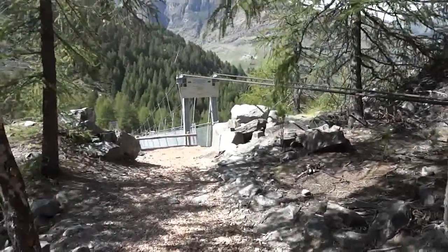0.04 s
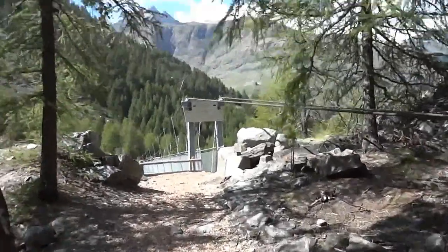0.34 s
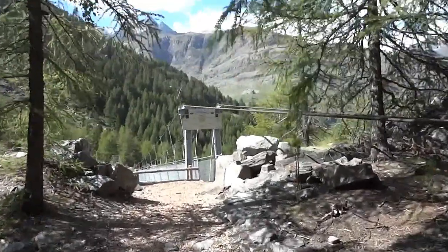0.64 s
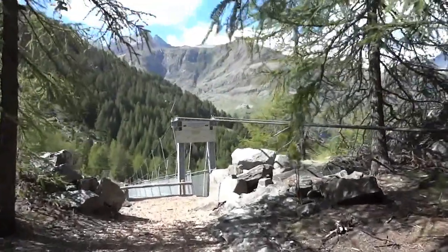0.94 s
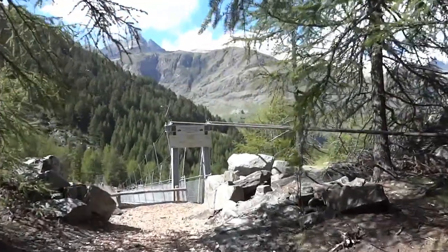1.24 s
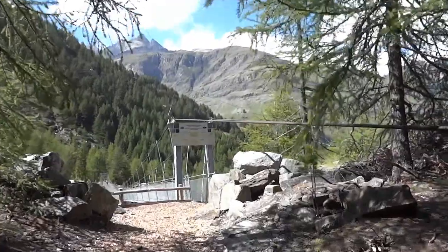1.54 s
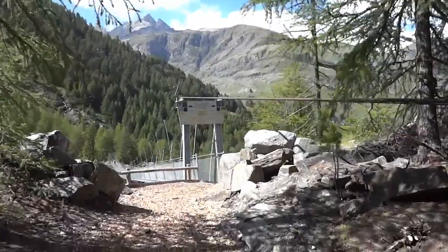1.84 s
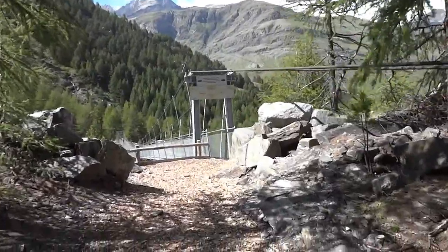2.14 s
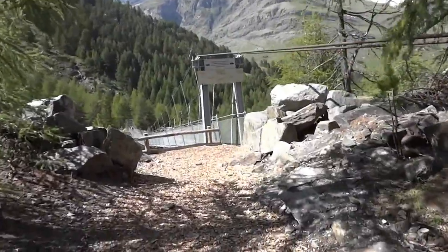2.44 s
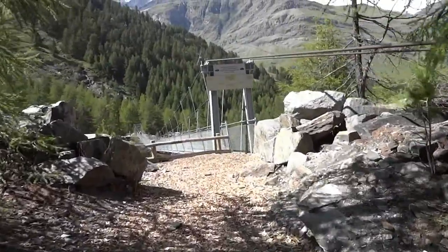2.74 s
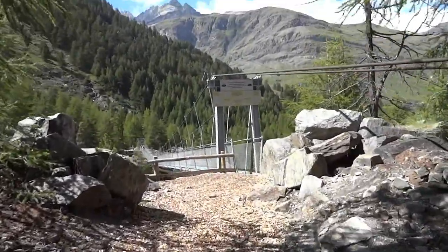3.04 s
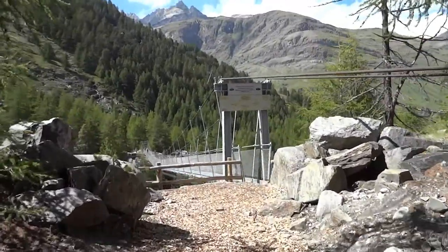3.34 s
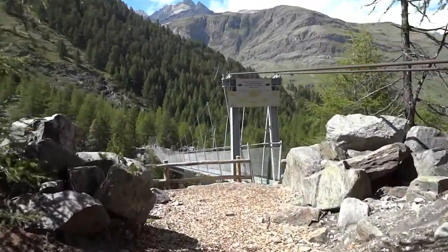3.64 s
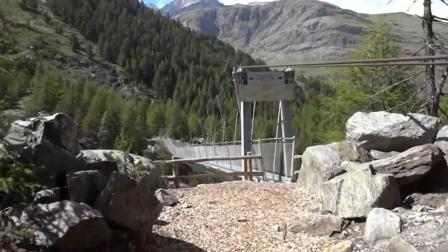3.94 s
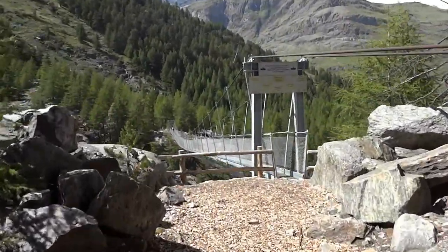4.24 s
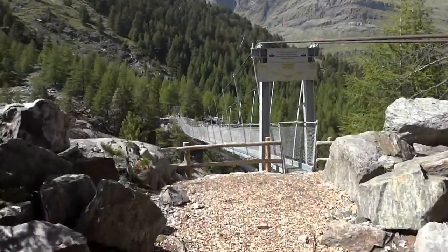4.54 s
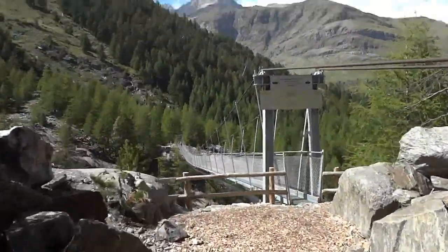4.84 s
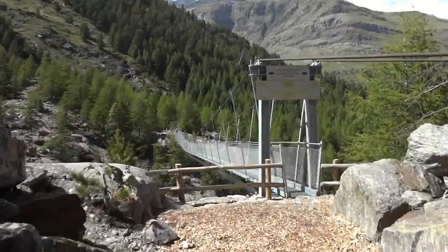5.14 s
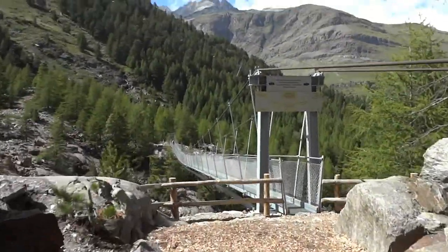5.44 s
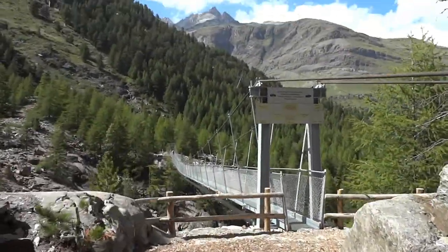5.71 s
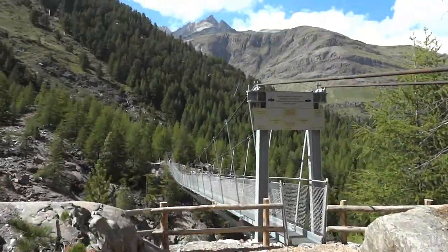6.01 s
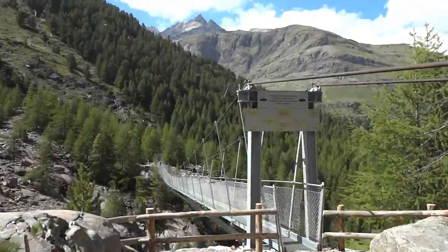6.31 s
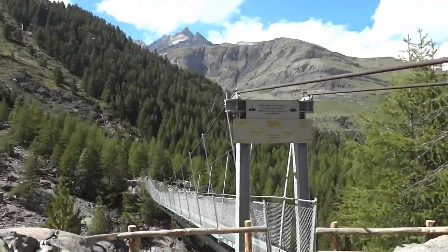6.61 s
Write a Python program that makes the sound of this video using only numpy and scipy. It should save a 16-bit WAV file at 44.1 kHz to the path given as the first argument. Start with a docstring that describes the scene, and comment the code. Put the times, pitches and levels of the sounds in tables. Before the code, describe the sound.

Footsteps crunch on a path of loose wood chips, close below the microphone, for about seven seconds. The chips grind, slide and rustle unevenly, with dry twigs snapping and small stones clicking. Sharper crunches come around 0.2 and 0.9 seconds, a quick run of cracks at 1.5, and two stick knocks near 2 and 2.2. The steps are lighter from about 2.5 to 4 seconds, then crunch and scrape more firmly between 4.4 and 5.2, and again from 5.9 to the end. Between 0.5 and 1 second a faint, distant bird whistles three thin, high, falling notes. Wind rumbles on the microphone, with low buffets around 1.7 and 2.5 seconds and stronger gusts from 3.6 to 4.4, around 6 and near 6.7. Throughout, a river rushes softly and steadily far below, slightly to the left.

```python
"""Wood chips crunch right below a hand-held camera: someone walks down a path towards a mountain gorge.
Chips grind and slide under the soles, clumps give way, dry twigs snap, sticks knock, small stones click,
and a few footfalls thud. Gusts rumble and buffet at the camera's close-set microphone ports.
Far below and a little to the left a river rushes, and near the start a small, distant bird whistles
three thin falling notes."""
import sys
import numpy as np
from scipy import signal
from scipy.fft import rfft, irfft
from scipy.io import wavfile
from scipy.ndimage import uniform_filter1d

SR = 44100
rng = np.random.default_rng(int(sys.argv[2]) if len(sys.argv) > 2 else 0)


def output_pcm(signal):
    """Save a mono or channel-first signal as 16-bit PCM at the path in sys.argv[1].

    Samples are clipped to [-1, 1] before scaling.
    """
    pcm = np.clip(np.atleast_2d(signal).T, -1, 1) * 32767
    wavfile.write(sys.argv[1], SR, np.round(pcm).astype(np.int16))


N = 302967
TIME, FREQ = np.arange(N) / SR, np.fft.rfftfreq(N, 1 / SR)


def footsteps():
    """Grinding, sliding and breaking chips on the path, right below the microphone."""
    # spectra of grinding chips, sliding fines and thin rustle: f/Hz, level/dB
    grind_colour = [(100, -28), (300, -6), (700, 4), (1400, 6.5), (2100, 8.5), (2700, 6.5), (3200, 3.5),
                    (4100, -11), (6000, -63.5), (11000, -66)]
    slide_colour = [(1000, -39), (3000, 15), (4500, 19.5), (6000, 17), (7500, 5), (9000, -38.5),
                    (11000, -101)]
    rustle_colour = [(4000, -22), (7000, 8.5), (9000, 19.5), (10300, 23.5), (11500, -3.5)]
    # side against mid for the close chips: f/Hz, level/dB
    chip_side = [(100, -10), (300, 0), (650, 2.5), (1400, 1.5), (2600, -.5), (5000, -6), (8000, -11),
                 (11000, -13)]
    # where the feet fall: t/s, left minus right/dB, phase lead (+ left, - right)
    step_lean = [(2.3, .7, .9), (2.8, 2, -.3), (3.0, 2, -.3), (3.26, 8, 0), (3.38, 6, 0), (3.55, .3, .4),
                 (4.3, .2, .9), (4.68, .2, .9), (4.78, .2, .2), (5.0, .2, .2), (5.12, .5, .9),
                 (6.4, 1.3, .9)]
    grind, slide, rustle = sole_pressure()
    chips = litter(grind, grind_colour, rate=7000, spread_db=-2.5, clump_db=2, gain_db=1)
    chips += litter(slide, slide_colour, rate=8300, spread_db=-2.5, clump_db=2, gain_db=-2)
    chips += litter(rustle, rustle_colour, rate=6200, spread_db=-0.5, clump_db=2.5, gain_db=-4)
    mid, stray = chips + crushes() + snaps() + knocks() + pebbles() + scrapes()
    lean_db, lead = curves(step_lean)
    balance = undb(np.array([lean_db, -lean_db]) / 2)
    return ports(mid, stray, chip_side, lead, stray_db=-5) * balance


def sole_pressure(sway_db=-1):
    """How hard the soles work the chips, the fines and the rustling litter: each scuff drives all three."""
    # a sole pressing and dragging: t/s, length/s, grind/dB, slide/dB, rustle/dB
    scuffs = [(0.0, 0.053, -50.5, -47, -32), (0.084, 0.091, -59.5, -50.5, -59),
              (0.212, 0.16, -53, -44, -46.5), (0.455, 0.033, -64, -40.5, -70.5),
              (0.538, 0.66, -72, -53.5, -92.5), (0.923, 0.034, -33.5, -35.5, -80),
              (0.994, 0.038, -40.5, -31.5, -56), (1.076, 0.21, -40, -64, -57),
              (1.314, 0.27, -39.5, -65.5, -75.5), (1.62, 0.048, -44, -38.5, -47),
              (1.722, 0.29, -40.5, -92, -49.5), (1.943, 0.072, -38.5, -66, -72.5),
              (2.066, 0.16, -37, -63.5, -90), (2.235, 0.064, -42, -40, -100),
              (2.355, 0.095, -52.5, -46.5, -90), (2.491, 0.027, -41, -40.5, -34.5),
              (2.639, 1.468, -53.5, -52.5, -52.5), (2.867, 0.065, -49.5, -45.5, -41.5),
              (3.259, 0.11, -48.5, -45, -45), (3.528, 0.0084, -59.5, -52, -41),
              (3.66, 0.18, -49, -56, -39.5), (4.212, .077, -46, -48, -49.5),
              (4.374, 0.0043, -42.5, -35.5, -48.5), (4.432, 0.032, -30.5, -27.5, -83),
              (4.562, 0.064, -34.5, -44, -69), (4.632, 0.13, -42, -41, -51),
              (4.786, 0.081, -37.5, -37, -43), (4.875, 0.1, -42, -41, -42), (4.974, 0.24, -49, -41.5, -45),
              (5.257, 0.25, -69, -52, -56), (5.508, 0.071, -43.5, -43, -84),
              (5.658, .66, -48.5, -55.5, -78.5), (6.094, 0.061, -55, -46, -88),
              (6.269, 0.057, -56.5, -44, -79.5), (6.437, 0.012, -36, -45.5, -89),
              (6.53, 0.057, -41, -47, -39.5), (6.61, 0.081, -45.5, -42, -36.5),
              (6.752, 0.13, -53, -55.5, -57.5)]
    # trodden litter still shifting between scuffs: grind/dB, slide/dB, rustle/dB
    settling_db = (-60.5, -79, -102)
    power = np.outer(undb(settling_db), undb(sway_db * drift(rate=20))) ** 2
    for start, length, *db in scuffs:
        power += np.outer(undb(db), envelope(start, length, attack_s=0.027, release_s=0.026)) ** 2
    return np.sqrt(power)


def litter(push, spectrum, rate, spread_db, clump_db, gain_db):
    """Loose pieces rub in small clumps; more pressure sets more of them moving. Two unrelated streams."""
    clumps = undb(clump_db * drift(rate=110))
    density = rate * np.sqrt(unit(push))
    rubs = [grains(density, spread_db) / np.sqrt(density) for _ in range(2)]
    streams = np.array([unit(shape(rub, colour(spectrum))) for rub in rubs])
    return streams * push * clumps * undb(gain_db)


def crushes(q=0.67, cutoff_ratio=1.76, thud_db=-9.5, thud_hz=560):
    """A clump collapses in a swell of fractures that ring at the pitch of its pieces and thud in the bed."""
    # clumps giving way underfoot: t/s at the peak, level/dB, rise/s, fall/s, f/Hz
    clumps = [(.009, -31.5, 0.013, 0.05, 7900), (0.26, -29.5, 0.0024, 0.0045, 2840),
              (.922, -27, 0.0055, 0.0071, 2530), (.9345, -20, 0.002, 0.0027, 1400),
              (0.9402, -21, 0.0011, .005, 950), (0.969, -33, .006, .007, 3300),
              (0.978, -21, 0.001, 0.005, 930), (1.004, -25.5, 0.011, 0.015, 7900),
              (1.021, -28.5, 0.0036, 0.014, 7000), (1.104, -27, 0.0084, 0.012, 1340),
              (1.575, -22.5, .0012, 0.004, 1710), (1.577, -28, .002, .003, 550),
              (1.643, -34.5, 0.034, 0.0091, 6150), (1.648, -32.5, 0.012, 0.016, 875),
              (1.851, -36, 0.0024, 0.002, 2780), (2.205, -26, 0.0064, 0.0079, 2320),
              (2.521, -31.5, 0.0047, 0.016, 1330), (2.842, -28.5, 0.0031, 0.016, 7300),
              (3.312, -27, 0.0015, 0.004, 1760), (4.218, -30, 0.0044, 0.0055, 1450),
              (4.248, -33.5, .0024, 0.0067, 1340), (4.374, -34.5, 0.012, 0.011, 7450),
              (4.431, -26, 0.0087, 0.0064, 4500), (4.443, -24.5, .004, 0.0083, 2980),
              (4.457, -23.5, 0.004, 0.012, 2650), (4.479, -23, 0.007, 0.016, 2670),
              (4.499, -31.5, .003, 0.017, 2470), (4.634, -19.5, 0.013, 0.0082, 2670),
              (5.1405, -25, 0.0053, 0.0026, 3180), (5.148, -24, 0.0041, 0.0048, 3070),
              (5.186, -34, 0.0048, 0.016, 2940), (5.508, -34.5, 0.0054, 0.013, 380),
              (5.896, -25.5, 0.0055, 0.0074, 4960), (5.908, -28, 0.0027, 0.011, 4400),
              (5.9, -24.5, 0.0017, 0.0074, 1520), (6.376, -26, 0.0016, 0.005, 2240),
              (6.401, -20.5, 0.00067, 0.0068, 1030), (6.404, -23.5, 0.002, 0.0099, 2470),
              (6.45, -29, 0.0048, 0.0055, 1830), (6.7, -25.5, 0.006, 0.013, 1180),
              (6.723, -32.5, 0.00092, 0.0063, 1220)]
    out = np.zeros((2, N))
    fractures = np.array([grains(rate=6000, spread_db=0.5) for _ in range(2)])
    for t, db, rise, fall, hz in clumps:
        near = np.abs(TIME - t) < 0.2
        age = TIME[near] - t
        swell = np.exp(-np.abs(age) / np.where(age < 0, rise, fall))
        ring = unit(damp(resonate_twice(fractures[:, near], hz, q), cutoff_ratio * hz))
        thud = unit(damp(resonate_twice(fractures[:, near], thud_hz, q), cutoff_ratio * thud_hz))
        out[:, near] += undb(db) * swell * (ring + undb(thud_db) * thud)
    return out


def snaps(q=0.9, splinter_s=0.0016, cutoff_ratio=1.8, gain_db=-1):
    """A sharp break rings for a cycle or two; splinters crackle just after it; wood damps the overtones."""
    # twigs and chips breaking: t/s, level/dB, f/Hz, splinters against the break/dB
    breaks = [(0.2212, -13, 6250, -23), (0.2476, -18, 5740, -15), (0.792, -30, 5500, 0),
              (0.906, -16, 2300, -11), (.918, -10.5, 2250, -0.5), (.932, -11, 1900, -13),
              (0.9775, -13, 1090, -27), (1.5018, -16, 2390, -13), (1.52, -17, 1900, -10),
              (1.5256, -17, 1700, -16), (1.5315, -12, 1900, -29), (1.536, -14, 2200, -19),
              (1.5423, -12.5, 2300, -16), (1.5477, -8.5, 2200, -26), (1.5608, -10, 1900, -38),
              (1.5702, -12, 1600, -32), (1.5732, -13, 1500, -28), (1.5748, -12, 2200, -22),
              (1.578, -15, 1700, -24), (1.746, -22, 1620, -5), (2.07, -20, 1860, 6),
              (3.005, -18, 8250, -36), (3.2643, -19, 3420, -25), (3.305, -26, 1200, -10),
              (3.3635, -16, 9350, -19), (3.5148, -23, 4200, -22), (3.5338, -15, 8800, -4.5),
              (3.8032, -25, 3700, -14), (4.634, -24, 2300, -7), (4.7497, -6.5, 5300, -33),
              (4.7614, -12, 4000, -28), (4.9426, -12.5, 1640, -12), (5.172, -13, 2700, -9),
              (5.574, -21, 3340, -14), (5.8964, -11, 5050, -16), (6.3987, -11, 1900, -22),
              (6.6986, -14.5, 1330, -32), (6.72, -15, 2100, -26)]
    out, age = np.zeros(N), TIME[:SR // 20]
    for t, db, hz, splinter_db in breaks:
        crack = undb(splinter_db) * rng.standard_normal(len(age)) * np.exp(-age / splinter_s)
        crack[0] += 1  # the break itself
        ring = damp(resonate_twice(crack, hz, q), cutoff_ratio * hz)
        add_hit(out, ring, int(t * SR), db + gain_db)
    return out


def knocks(q=2.7, cutoff_hz=4200, thud_hz=800, thud_db=-9):
    """A dry stick rings for a few cycles at one pitch and thuds into the bed of chips."""
    # loose sticks knocking together: t/s, level/dB, f/Hz
    sticks = [(1.991, -10.5, 2300), (2.2024, -12.5, 2330)]
    out, tap = np.zeros(N), signal.unit_impulse(SR // 20)
    thud = undb(thud_db) * damp(resonate(tap, thud_hz, q=1), 2 * thud_hz)
    for t, db, hz in sticks:
        ring = damp(resonate_twice(tap, hz, q), cutoff_hz)
        add_hit(out, ring + thud, int(t * SR), db)
    return out


def pebbles(contact_s=0.00015):
    """Stone on stone: a hard, short contact rings a few modes for some milliseconds."""
    # small stones clicking underfoot: t/s, level/dB, f/Hz, t60/s
    clicks = [(0.5153, -15, 3560, .006), (.5163, -17.5, 3480, .007), (.9356, -12.5, 2150, .008),
              (0.9413, -14, 2100, 0.0091), (1.502, -13.5, 1860, 0.011), (3.2642, -21.5, 2730, 0.0044),
              (3.266, -20.5, 2700, 0.0103), (5.1409, -14.5, 3200, 0.0044), (6.4035, -21, 1890, .016),
              (6.4064, -20.5, 2530, .012), (6.409, -18, 1480, .014)]
    # modes of a stone: multiple of its pitch, level/dB
    modes = [(.47, -12), (1, -2), (1.36, 0), (1.79, -2), (2.29, -9)]
    out, age = np.zeros(N), TIME[:SR // 20]
    onset = 1 - np.exp(-(age / contact_s) ** 2)
    for t, db, hz, t60 in clicks:
        ring = sum(undb(mode_db) * np.sin(2 * np.pi * (hz * ratio * age + rng.random()))
                   for ratio, mode_db in modes)
        decay = np.exp(-np.log(1000) * age / t60)
        add_hit(out, ring * decay * onset, int(t * SR), db)
    return out


def scrapes(edge_s=0.0099):
    """Stick and slip under a dragging sole keep the chips ringing for as long as the scrape lasts."""
    # drags of the sole: t/s, length/s, level/dB, f/Hz, Q
    drags = [(.997, .027, -35, 4380, 9), (.997, .025, -34, 7100, 4), (4.79, .17, -40, 2610, 8),
             (4.838, .024, -39, 5650, 4), (6.54, .05, -40, 3800, 1.8), (6.6, .095, -40.5, 4500, 2.8)]
    slips = grains(rate=1900, spread_db=0)
    return sum(undb(db) * unit(resonate_twice(slips, hz, q)) * envelope(start, length, edge_s, edge_s)
               for start, length, db, hz, q in drags)


def wind_and_thuds(rumble_db=-45, rumble_growth=0.59, flutter_db=-0.5, tear_db=-51, tear_growth=3):
    """Light air rumbles at the ports, gusts flutter, the strongest tear higher; a few footfalls thud."""
    # spectra of the three kinds of turbulence: f/Hz, level/dB
    rumble_colour = [(20, -22.5), (60, -5), (130, -1), (220, -6), (400, -17.5), (900, -56), (2000, -77.5)]
    flutter_colour = [(30, -34.5), (100, -9.5), (190, 1), (310, -2.5), (500, -10), (900, -19), (2000, -55),
                      (5000, -105)]
    tear_colour = [(150, -15), (400, 13.5), (600, 16), (900, 8), (1500, -16.5), (4000, -64.5)]
    # side against mid for wind on the microphone: f/Hz, level/dB
    wind_side = [(30, -14), (100, -9), (200, -3.5), (350, 0), (700, 2), (2000, -2)]
    # how the air meets the ports: t/s, phase lead (+ left, - right), rumble boost/dB
    airflow = [(0, -0.84, 3), (.3, -0.27, -2.5), (.7, -0.043, -11.5), (1.15, -0.18, -5), (1.45, 0.14, 4),
               (1.7, 0.065, 1), (2.1, -0.05, 6), (2.5, 0.96, 2.5), (3.0, -0.041, 7), (3.6, -0.83, -0.5),
               (4.35, -0.82, -2), (4.5, 0.021, 5), (4.8, -0.4, 1), (5.1, 0.08, 1.5), (5.4, -0.7, 2.5),
               (6.0, 0.93, 1), (6.6, 0.016, -4)]
    lead, boost_db = curves(airflow)
    strength = low_swells()
    rumble = undb(rumble_db + boost_db) * unit(strength ** rumble_growth) * turbulence(rumble_colour)
    flutter = undb(flutter_db) * strength * turbulence(flutter_colour)
    tear = undb(tear_db) * unit(strength ** tear_growth) * turbulence(tear_colour)
    lumps = undb(1.7 * drift(rate=50))
    mid, stray = (rumble + flutter + tear) * lumps
    return ports(mid + low_thumps(), stray, wind_side, lead, stray_db=-3)


def low_swells(rise_s=0.051, fall_s=0.031, breeze_db=-64):
    """Strength of the low noise: gusts and one footfall rise, hold and fall over a light breeze."""
    # gusts reaching the microphone, and the low thump of a footfall near 0.94 s: t/s, length/s, level/dB
    swells = [(0.0, 0.044, -48.5), (0.941, 0.086, -49), (1.49, 0.32, -47), (1.674, 0.041, -42.5),
              (1.992, 0.45, -69), (2.365, 0.3, -40.5), (2.687, 0.18, -55.5), (3.49, 0.13, -48),
              (3.668, 0.18, -34), (3.815, .03, -41), (4.114, 0.23, -36.5), (4.476, 0.045, -43),
              (4.706, 0.15, -39), (4.919, 0.17, -39.5), (5.678, 0.12, -48.5), (5.92, 0.22, -29.5),
              (6.173, 0.18, -35), (6.36, 0.32, -40), (6.675, 0.066, -34), (6.773, 0.097, -45.5)]
    power = sum((undb(db) * envelope(start, length, rise_s, fall_s)) ** 2 for start, length, db in swells)
    return np.sqrt(power + undb(breeze_db) ** 2)


def turbulence(spectrum):
    """Two unrelated streams of small eddies."""
    return np.array([unit(shape(grains(rate=1800, spread_db=2), colour(spectrum))) for _ in range(2)])


def low_thumps(q=1.4, pitch_scatter=0.14, gain_db=-1):
    """An eddy or a soft footfall is one steep pressure kick that dies within a couple of cycles."""
    # eddies hitting the ports, and soft footfall thuds at 1.875 and 3.488 s:
    # t/s at the peak, level/dB, f/Hz
    thumps = [(.008, -30.5, 223), (1.691, -29, 288), (1.702, -20, 183), (1.718, -29, 230),
              (1.756, -24, 150), (1.787, -26, 290), (1.875, -30, 190), (2.447, -23, 208), (2.472, -21, 210),
              (2.506, -26.5, 230), (2.549, -22.5, 266), (2.576, -28, 200), (3.488, -29, 253),
              (3.641, -15, 336), (3.662, -18, 226), (3.722, -19, 248), (3.736, -11.5, 244),
              (3.751, -18, 194), (3.782, -17, 233), (3.802, -20, 252), (3.82, -18, 262), (3.844, -15, 224),
              (4.193, -13.5, 534), (4.201, -12.5, 324), (4.252, -22, 278), (4.276, -21.5, 258),
              (4.284, -20.5, 254), (4.33, -14.5, 227), (4.337, -17.5, 347), (4.713, -17.5, 240),
              (4.794, -25, 196), (4.988, -21, 195), (5.129, -25.5, 148), (5.937, -13, 264),
              (5.948, -15.5, 214), (5.97, -22, 380), (6.003, -17, 580), (6.015, -20, 267),
              (6.03, -14.5, 234), (6.0355, -12.5, 760), (6.051, -18.5, 298), (6.061, -21, 280),
              (6.093, -15, 560), (6.111, -20, 240), (6.167, -19, 295), (6.278, -23, 223),
              (6.678, -18.5, 290), (6.728, -21, 282)]
    out, age = np.zeros(N), TIME[:SR // 10]
    for t, db, hz in thumps:
        pitch = hz * np.exp(pitch_scatter * rng.standard_normal())
        push = np.exp(-2 * np.pi * age * pitch)
        kick = rng.choice([-1, 1]) * resonate_twice(push, pitch, q)
        start = max(int(t * SR) - np.abs(kick).argmax(), 0)
        add_hit(out, kick, start, db + gain_db)
    return out


def river(level_db=-43.5, left_db=6.5, split_hz=900, surge_db=0.8):
    """White water far down in the gorge: a smooth rush whose lows and highs surge a little on their own."""
    # spectrum of the water as heard from the path: f/Hz, level/dB
    river_colour = [(20, -9.5), (100, -23), (160, -10), (250, 3), (450, 6.5), (850, 7.5), (1400, 3.5),
                    (2500, -2), (4000, -8), (7000, -53), (11000, -78.5)]
    # side against mid for sound from all around: f/Hz, level/dB
    river_side = [(50, -24), (250, -13), (600, -10), (1300, -7), (3000, -5), (8000, -6)]
    low = 1 / (1 + (FREQ / split_hz) ** 2)
    water = []
    for _ in range(2):
        rush = unit(shape(rng.standard_normal(N), colour(river_colour)))
        water.append(sum(shape(rush, band) * undb(surge_db * drift(rate=7)) for band in (low, 1 - low)))
    mid, side = water[0], shape(water[1], colour(river_side))
    lean_db = left_db / 2 * FREQ / (FREQ + 250)  # the bass has no direction
    return undb(level_db) * np.array([shape(mid + side, undb(lean_db)), shape(mid - side, undb(-lean_db))])


def bird(hold_s=0.056, waver=0.012, flutter_db=3, forest_t60_s=0.53, echo_db=-2):
    """A far, wavering whistle: each note arches over its crest and slides down; trunks scatter the call."""
    # three thin notes: t/s at the crest, level/dB, crest f/Hz, end f/Hz, fall/s
    notes = [(.525, -53, 7980, 7280, .05), (.705, -55.5, 7850, 6900, .06), (.893, -49, 7250, 6550, .028)]
    call = np.zeros(N)
    for t, db, crest_hz, end_hz, fall in notes:
        arch_hz = end_hz + (crest_hz - end_hz) * np.exp(-((TIME - t) / fall) ** 2)
        hz = arch_hz * (1 + waver * drift(rate=1100))
        swell = envelope(t, hold_s, attack_s=0.02, release_s=0.023)
        loudness = undb(db + flutter_db * drift(rate=80)) * swell
        call += loudness * np.sin(2 * np.pi * np.cumsum(hz) / SR)
    trunks = rng.standard_normal((2, SR)) * np.exp(-np.log(1000) * TIME[:SR] / forest_t60_s)
    echoes = np.array([signal.fftconvolve(call, tail / np.linalg.norm(tail))[:N] for tail in trunks])
    return call + undb(echo_db) * echoes


def ports(mid, stray, side_colour, lead, stray_db):
    """Close-set ports turn a near sound into a side signal a quarter turn out of phase, plus stray sound."""
    side_gain = colour(side_colour)
    side = lead * shape(mid, 1j * side_gain) + undb(stray_db) * shape(stray, side_gain)
    return np.array([mid + side, mid - side])


def grains(rate, spread_db):
    """Tiny impacts of uneven size at random moments, rate per second."""
    chance, size, sign = rng.random(N), rng.exponential(size=N), rng.choice([-1, 1], N)
    return unit((chance < rate / SR) * sign * undb(spread_db * np.minimum(size, 4)))


def drift(rate):
    """Smooth random wander with a spread near 1, taking rate new values per second."""
    count = int(SR / rate)
    held = rng.standard_normal(2048)[np.arange(N) // count % 2048]
    return np.sqrt(2) * uniform_filter1d(uniform_filter1d(held, count), count)


def envelope(start, length, attack_s, release_s):
    """Swell up to the start, hold for the length, die away."""
    return np.exp(np.minimum(TIME - start, 0) / attack_s - np.maximum(TIME - start - length, 0) / release_s)


def curves(rows):
    """One curve over time for each value column of (t/s, values...) rows."""
    times, *columns = np.transpose(rows)
    return [np.interp(TIME, times, column) for column in columns]


def add_hit(out, hit, start, peak_db):
    """Mix a short sound in at a start sample and peak level."""
    out[start:start + len(hit)] += undb(peak_db) * hit[:N - start] / np.abs(hit).max()


def resonate(x, hz, q):
    """One damped resonance."""
    hz = min(hz, SR / 3)
    return signal.lfilter(*signal.iirpeak(hz, max(q, 3 * hz / SR), fs=SR), x)


def resonate_twice(x, hz, q):
    """Two equal resonances in series, for steeper skirts."""
    return resonate(resonate(x, hz, q), hz, q)


def damp(x, hz):
    """Soft wood swallows what lies above a frequency."""
    return signal.lfilter(*signal.butter(2, min(hz, SR / 3), fs=SR), x)


def colour(points):
    """Gain at every frequency from (f/Hz, level/dB) points."""
    hz, db = np.transpose(points)
    return undb(np.interp(np.log(FREQ + 1), np.log(hz), db))


def shape(x, gain):
    """Filter by a gain per frequency."""
    return irfft(rfft(x) * gain, N)


def unit(x):
    """Scale to rms 1."""
    return x / np.sqrt(np.mean(x ** 2) + 1e-18)


def undb(db):
    """Decibels to gain."""
    return 10 ** (np.asarray(db) / 20)


def scene():
    """Steps close below, wind on the microphone, river and bird in the distance."""
    return footsteps() + wind_and_thuds() + river() + bird()


def record(dry):
    """The camera cuts the top of the treble."""
    top_hz = 11200
    return signal.sosfilt(signal.ellip(10, 0.2, 80, top_hz, fs=SR, output="sos"), dry)


dry = scene()
out = record(dry)
output_pcm(out)
```